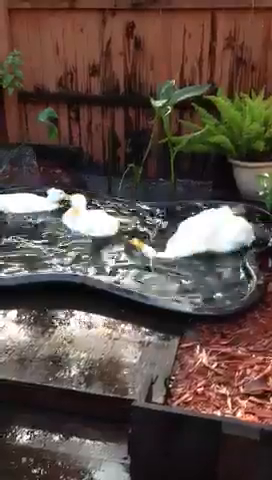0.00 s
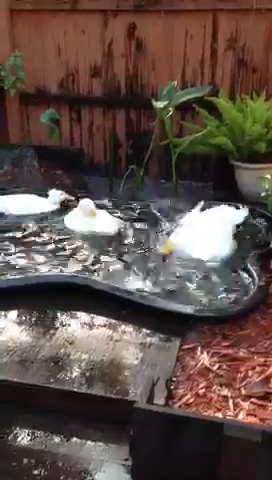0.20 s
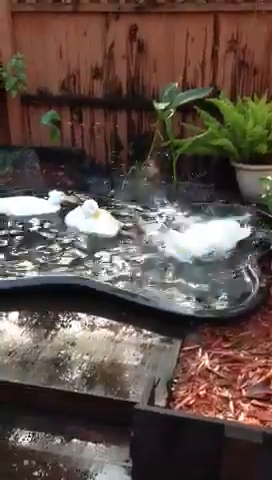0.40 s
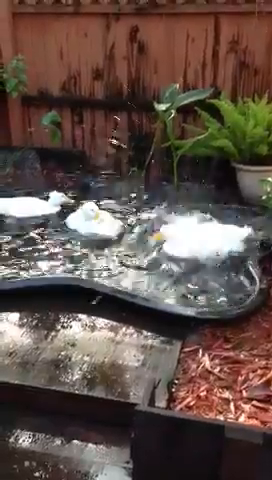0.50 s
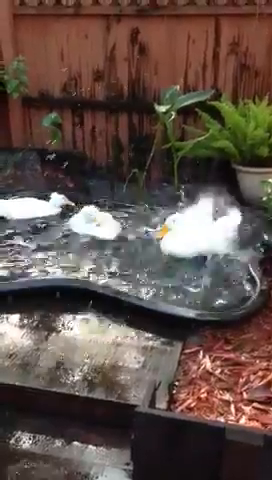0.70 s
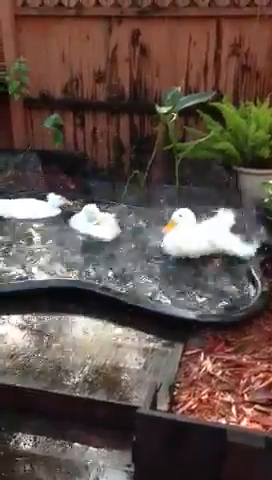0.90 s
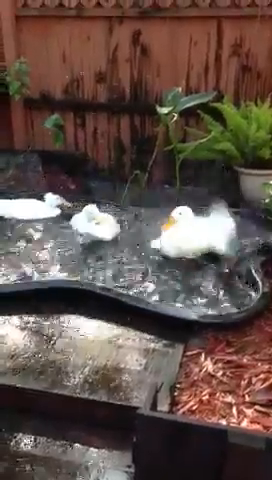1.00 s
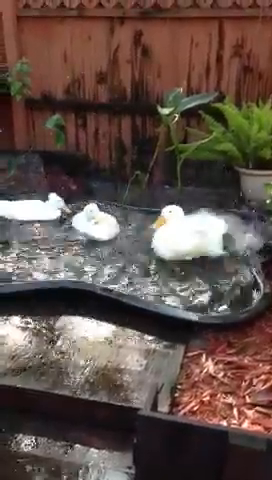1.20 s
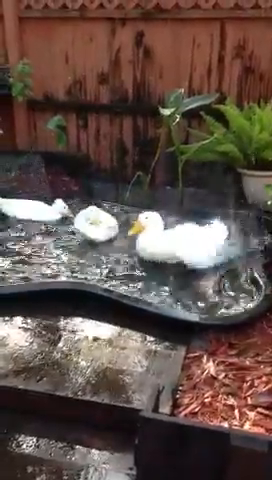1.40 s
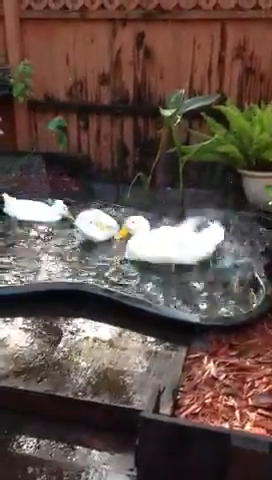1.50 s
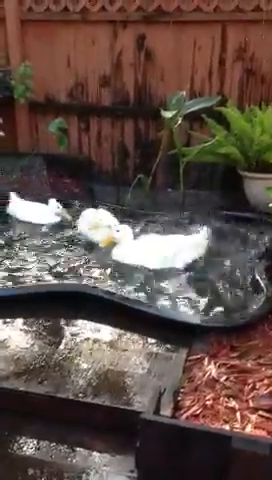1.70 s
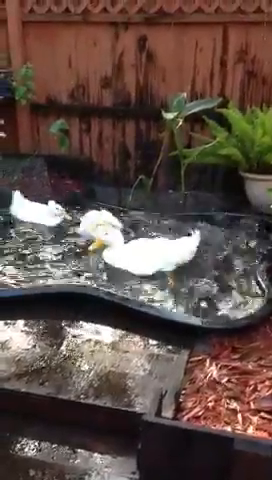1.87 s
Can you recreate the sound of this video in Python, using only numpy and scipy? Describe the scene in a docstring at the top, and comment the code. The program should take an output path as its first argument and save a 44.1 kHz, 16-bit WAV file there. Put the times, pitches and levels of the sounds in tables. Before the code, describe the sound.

Splashing water from a bathing duck, first a body splash with gurgling gushes, then rapid wet slaps of beating wings, and finally sparse drips, heard outdoors from a few metres with a short fence echo.

```python
"""A garden pond, a few metres from the microphone: a duck bathes. It ducks under and throws water over its
back in gushes, with a first splash of the body, then beats its wings: five wing slaps on the water.
Slaps are pulses, cracks, thumps and spray; water is tiny impacts and bubbles, which thin out at the end.
Throughout, a low hum, probably the pond pump, runs under quiet air; a wooden fence echoes the duck briefly."""
import sys
import numpy as np
from scipy import signal
from scipy.fft import rfft, irfft
from scipy.io import wavfile

SR = 44100
rng = np.random.default_rng(int(sys.argv[2]) if len(sys.argv) > 2 else 0)


def file_out(sig):
    """Save sig as 16-bit WAV at sys.argv[1]."""
    # one column per channel
    cols = np.atleast_2d(sig).T
    # limit, then scale
    lim = np.clip(cols, -1, 1)
    pcm = np.round(lim * 32767).astype(np.int16)
    wavfile.write(sys.argv[1], SR, pcm)


N = 85995  # length [samples]


def undb(db):
    """Decibels to gain."""
    return 10 ** (np.asarray(db) / 20)


def clock():
    """Time of each sample in seconds."""
    return np.arange(N) / SR


def unit(x):
    """Scale to rms 1."""
    return x / np.sqrt(np.mean(x ** 2) + 1e-20)


def freqs():
    """Frequency of each spectral bin in Hz, at least 1."""
    return np.maximum(np.arange(N // 2 + 1) * SR / N, 1)


def colour(x, points, tilt_db=0):
    """Weight the spectrum of x by (frequency [Hz], level [dB]) points and a tilt per octave; rms 1."""
    hz, db = np.array(points).T
    octave = np.log2(freqs())
    weight_db = np.interp(octave, np.log2(hz), db) + tilt_db * octave
    return unit(irfft(rfft(x) * undb(weight_db), N))


def band(x, hz, octaves):
    """A bell-shaped band of x; rms 1."""
    bell = np.exp(-.5 * (np.log2(freqs() / hz) / octaves) ** 2)
    return unit(irfft(rfft(x) * bell, N))


def noise():
    """White noise."""
    return rng.standard_normal(N)


def walk(rate_hz):
    """Slow random wandering, rms 1."""
    return unit(irfft(rfft(noise()) * np.exp(-(freqs() / rate_hz) ** 2), N))


def clicks(per_s, scatter_db):
    """Tiny impacts at random moments, a few much larger than the rest."""
    struck = rng.random(N) < per_s / SR
    size = np.minimum(rng.exponential(size=N), 5)
    return struck * np.sign(noise()) * undb(scatter_db * size)


def swell(at, rise, fall):
    """An envelope that grows exponentially to 1 at its top and dies away."""
    t = clock() - at
    return np.exp(np.minimum(t / rise, -t / fall))


def add(out, at, hz, gain, cycles, glide):
    """Add one bubble: it radiates the change of a pulsation that rises in pitch and fades by 60 dB."""
    start = max(int(at * SR), 0)
    length = max(min(int(cycles / hz * SR), N - start), 0)
    t = np.arange(length) / SR
    age = t * hz / cycles  # 0 to 1 over its life
    ring = np.sin(2 * np.pi * hz * t * (1 + glide * age / 2))
    onset = 1 - np.exp(-2 * np.pi * hz * t)
    pulsation = ring * np.exp(-np.log(1000) * age) * onset
    out[start:start + length] += gain * np.diff(pulsation, prepend=0) * SR / (2 * np.pi * hz)


BUBBLE_SCATTER_DB, BUBBLE_GLIDE = 3.5, .3  # spread of loudness; rise of pitch as a share


def bubble_cloud(low_hz, high_hz, cycles, count):
    """Many small bubbles of random size, living half to one and a half times the cycles; rms 1."""
    out = np.zeros(N)
    for k, (when, size, loud, life) in enumerate(rng.random((count, 4))):
        at = (k + 2 * when) / count * N / SR
        hz = low_hz * (high_hz / low_hz) ** size
        gain = undb(-BUBBLE_SCATTER_DB * np.log(loud + 0.037))
        add(out, at, hz, gain, cycles * (.5 + life), BUBBLE_GLIDE)
    return unit(out)


# Weighting of the wet crack: (frequency [Hz], level [dB per Hz])
CRACK_SPECTRUM = [(80, -24), (200, -7.5), (450, -9.5), (900, -9), (2000, 1), (3500, -2), (5000, -3.5),
                  (7500, -1), (10000, -10), (15000, -14.5)]
# Weighting of the spray, also of the tick of a drop: (frequency [Hz], level [dB per Hz])
SPRAY_SPECTRUM = [(300, -30), (1000, -26), (2500, -27), (4500, 5.5), (7000, 3.5), (10000, -1.5),
                  (15000, -8)]
IMPACT_CYCLES, CRACK_RISE_S = 4.3, 0.00041
THUMP_RISE_S, THUMP_FALL_S = 0.0042, 0.0047
SPRAY_RISE_S, SPRAY_FALL_S, SPRAY_PER_S = 0.0089, 0.015, 4200
# Density and size spread of the impacts in gushes and splatter; the spray shares the spread
GUSH_PER_S, GUSH_SCATTER_DB = 4600, 3
# A first splash of the body, then five wing slaps on the water: (time [s],
# impact level [dB, before doubling the amplitude], impact pitch [Hz], crack level [dB], crack decay [s],
# crack brightness [dB per octave], thump level [dB], thump pitch [Hz], spray level [dB])
SLAPS = [(0.3315, -22.5, 2010, -26, 0.0058, -1.5, -42.5, 302.2, -37),
         (.9620, -15.5, 2970, -29, 0.0055, -1.2, -34.5, 190, -32),
         (1.0812, -12.5, 1830, -16.5, 0.0025, -1.55, -33, 198, -38),
         (1.2112, -23.5, 960, -30, 0.0089, -1.8, -41.5, 240, -43),
         (1.3347, -15, 2000, -23, 0.0025, -1.2, -46, 194.4, -43.5),
         (1.4834, -18, 1670, -24.5, 0.0036, 4.6, -41.5, 232.5, -42)]


def slaps():
    """A sharp pressure pulse, a wet crack, the thump of the hollow in the water, and spray."""
    out = np.zeros(N)
    for at, impact_db, hz, crack_db, decay, tilt_db, thump_db, thump_hz, spray_db in SLAPS:
        add(out, at, hz, 2 * undb(impact_db), IMPACT_CYCLES, 0)
        crack = colour(noise(), CRACK_SPECTRUM, tilt_db)
        out += undb(crack_db) * swell(at, CRACK_RISE_S, decay) * crack
        thump = unit(np.sin(2 * np.pi * (thump_hz * clock() + rng.random())))
        out += undb(thump_db) * swell(at, THUMP_RISE_S, THUMP_FALL_S) * thump
        spray = colour(clicks(SPRAY_PER_S, GUSH_SCATTER_DB), SPRAY_SPECTRUM)
        out += undb(spray_db) * swell(at, SPRAY_RISE_S, SPRAY_FALL_S) * spray
    return out


GUSH_IMPACT_DB = -0.5
FROTH_DB, FROTH_LOW_HZ, FROTH_HIGH_HZ, FROTH_CYCLES = -7.5, 798, 4980, 20
# Gushes of water pushed by body and wings: (time of the top [s], level [dB], rise [s], fall [s],
# centre [Hz], width [octaves])
WATER_GUSHES = [(.03, -58, .02, .02, 6000, 0.19), (.072, -53, 0.018, 0.011, 2070, 0.64),
                (0.231, -43.5, 0.0096, .04, 3070, 0.51), (0.315, -47, 0.0046, 0.0086, 450, 0.51),
                (0.32, -43, 0.0028, .008, 2130, 0.95), (.328, -27, 0.01, 0.0037, 1770, 0.57),
                (.482, -45, 0.034, 0.0082, 1430, .8), (0.551, -37, 0.022, 0.017, 1830, 0.96),
                (0.677, -39.5, 0.0019, .006, 930, 1), (0.668, -35.5, 0.013, 0.031, 2600, 1.1),
                (0.768, -37, 0.0087, 0.0042, 2050, 0.4), (0.807, -36, 0.049, 0.019, 2660, 1.07),
                (0.9613, -31, 0.0074, 0.0033, 1080, 0.79), (0.985, -42, 0.024, 0.012, 2500, 0.45),
                (1.14, -55, .02, .015, 1690, 0.27), (1.193, -39.5, 0.0043, 0.0086, 2670, 0.2),
                (1.318, -38, 0.0037, .007, 800, 0.55), (1.3305, -32, 0.002, .002, 1400, 1.6),
                (1.386, -44, 0.013, 0.023, 1550, 0.94), (1.4785, -31.5, 0.0004, 0.0085, 1760, 0.64),
                (1.52, -49.5, 0.0089, 0.039, 1390, .8), (1.816, -49, 0.0044, .005, 3400, .8),
                (1.670, -42, .004, 0.0055, 3680, 0.97), (1.694, -42, 0.0035, 0.0051, 3180, 0.36)]


def gushes():
    """Sheets of water break up into dense bursts of tiny impacts and trapped bubbles."""
    froth = bubble_cloud(FROTH_LOW_HZ, FROTH_HIGH_HZ, FROTH_CYCLES, count=1100)
    out = np.zeros(N)
    for at, db, rise, fall, hz, octaves in WATER_GUSHES:
        impacts = undb(GUSH_IMPACT_DB) * band(clicks(GUSH_PER_S, GUSH_SCATTER_DB), hz, octaves)
        bubbles = undb(FROTH_DB) * band(froth, hz, octaves)
        out += undb(db) * swell(at, rise, fall) * (impacts + bubbles)
    return out


# Levels of patter, fizz and gurgle are relative to the stirring
PATTER_DB, PATTER_PER_S, PATTER_SCATTER_DB = -1.5, 3200, 1
PATTER_FLICKER_DB, PATTER_FLICKER_HZ = 1.5, 60
FIZZ_DB, FIZZ_LOW_HZ, FIZZ_HIGH_HZ, FIZZ_CYCLES = -6.5, 2376, 9340, 25
GURGLE_DB, GURGLE_LOW_HZ, GURGLE_HIGH_HZ, GURGLE_CYCLES = -7.5, 701, 2810, 15.6
SLOSH_DB, SLOSH_HZ, SLOSH_OCTAVES = -59.5, 268, 0.43
SLOSH_FOLLOW = 0.48  # share of the stirring's dB swings
# Weighting of the patter: (frequency [Hz], level [dB per Hz])
PATTER_SPECTRUM = [(300, -24), (700, -5.5), (1500, 4.5), (3000, 1), (5000, 1), (7000, 0), (10000, -5.5),
                   (15000, -13.5)]
# How hard the water is stirred: (time [s], level [dB])
STIRRING = [(0, -63), (0.188, -56), (0.224, -43), (.30, -49.5), (.36, -44.5), (.43, -50), (.47, -43.5),
            (.53, -45.5), (.63, -45), (.71, -45), (.82, -42.5), (.865, -49), (.91, -44.5), (1.0, -46),
            (1.045, -46.5), (1.12, -46.5), (1.3, -45), (1.5, -49.5), (1.62, -51), (1.76, -52.5),
            (1.86, -60), (1.95, -57.5)]


def stirred_water():
    """Uneven patter, fizz, gurgle and a low slosh all follow how hard the water is stirred."""
    stir = undb(np.interp(clock(), *np.array(STIRRING).T))
    drops = colour(clicks(PATTER_PER_S, PATTER_SCATTER_DB), PATTER_SPECTRUM)
    patter = undb(PATTER_DB + PATTER_FLICKER_DB * walk(PATTER_FLICKER_HZ)) * drops
    fizz = undb(FIZZ_DB) * bubble_cloud(FIZZ_LOW_HZ, FIZZ_HIGH_HZ, FIZZ_CYCLES, count=700)
    gurgle = undb(GURGLE_DB) * bubble_cloud(GURGLE_LOW_HZ, GURGLE_HIGH_HZ, GURGLE_CYCLES, count=320)
    slosh = undb(SLOSH_DB) * band(noise(), SLOSH_HZ, SLOSH_OCTAVES)
    return stir * (patter + fizz + gurgle) + unit(stir ** SLOSH_FOLLOW) * slosh


# Single bubbles and air pockets: (time [s], pitch [Hz], peak level [dB], life [cycles],
# rise of pitch [share])
SINGLE_BUBBLES = [(.0865, 2570, -34.5, 55, 0.065), (.106, 785, -41, 110, 0.27),
                  (0.127, 861, -45.5, 83, 1.53), (.139, 1022, -42, 91, .8), (.2698, 3080, -31, 65, 0),
                  (.273, 250, -36.5, 10, 0.36), (.306, 910, -37, 18, 1.2), (.3167, 2700, -24, 22, 1.2),
                  (.442, 623, -43, 58, 0.59), (.480, 2000, -33, 50, 0.33), (.489, 996, -33.5, 32, 0),
                  (.503, 1290, -44, 45, 0.23), (.541, 1033, -35.5, 36, 0.68), (.673, 900, -20.5, 7, 0.18),
                  (.764, 1510, -29, 29, 0), (.881, 1760, -39, 49, 0.054), (.889, 1020, -40.5, 26, 1.34),
                  (.9455, 270, -29.5, 9.3, 0.96), (1.066, 616, -32.5, 15, 0.29), (1.0825, 1480, -18, 13, 0),
                  (1.188, 1174, -37.5, 72, .1), (1.208, 560, -33.5, 17, 0.024),
                  (1.317, 300, -33, 7.3, 0.25), (1.358, 1980, -36.5, 55, 0.003), (1.384, 1180, -53, 42, 1),
                  (1.452, 840, -33.5, 11, 0), (1.480, 554, -26.5, 13, 0.25), (1.482, 900, -30.5, 47, .03),
                  (1.559, 785, -42.5, 19, 0), (1.586, 1150, -44, 41, 1.9)]


def single_bubbles():
    """Larger bubbles and air pockets ring, many of them rising in pitch."""
    out = np.zeros(N)
    for at, hz, db, cycles, glide in SINGLE_BUBBLES:
        add(out, at, hz, undb(db), cycles, glide)
    return out


DROP_CYCLES, DROP_GLIDE = 26.3, 0.046  # life of the ping; rise of its pitch as a share
# Tick and splatter levels are relative to the ping
DROP_TICK_DB, DROP_TICK_S = -15, 0.002
SPLATTER_DB, SPLATTER_S, SPLATTER_OCTAVES = -13.5, 0.0034, 0.36
# Separate drops landing: (time [s], pitch [Hz], peak level of the ping [dB])
SINGLE_DROPS = [(0.0774, 9100, -34), (0.119, 7000, -39.5), (.239, 6470, -32), (0.2607, 4770, -30),
                (.466, 6040, -24.5), (.519, 5300, -29), (.527, 4100, -28.5), (0.576, 6200, -29),
                (.829, 8650, -22), (0.869, 4930, -27), (1.052, 7060, -30), (1.506, 6600, -30),
                (1.584, 4330, -40.5), (1.618, 4900, -35), (1.676, 4240, -34.5), (1.700, 10300, -31),
                (1.733, 2750, -37), (1.753, 4270, -37), (1.759, 3140, -35), (1.798, 3940, -40),
                (1.817, 3350, -40.5), (1.888, 4570, -36.5)]


def single_drops():
    """Each drop ticks on the surface, pings as a bubble and splatters around its pitch."""
    out = np.zeros(N)
    splatter = clicks(GUSH_PER_S, GUSH_SCATTER_DB)
    tick = undb(DROP_TICK_DB) * colour(noise(), SPRAY_SPECTRUM)
    for at, hz, db in SINGLE_DROPS:
        add(out, at, hz, undb(db), DROP_CYCLES, DROP_GLIDE)
        out += undb(db) * swell(at, CRACK_RISE_S, DROP_TICK_S) * tick
        burst = band(splatter, hz, SPLATTER_OCTAVES)
        out += undb(db + SPLATTER_DB) * swell(at, CRACK_RISE_S, SPLATTER_S) * burst
    return out


FENCE_S, FENCE_DB = .012, -22  # echo delay and level
YARD_DB, YARD_T60_S, YARD_HZ = -18, 0.15, 4520  # tail level, 60 dB decay, treble corner


def yard(x):
    """One echo from the fence and a short, duller tail of decaying noise."""
    t = clock()
    dull = irfft(rfft(noise()) / np.hypot(1, freqs() / YARD_HZ), N)
    decay = np.exp(-np.log(1000) * t / YARD_T60_S)
    tail = dull * decay * np.minimum(t / FENCE_S, 1)  # builds up until the echo
    wet = signal.fftconvolve(x, tail / np.linalg.norm(tail))[:N]
    echo = np.interp(t - FENCE_S, t, x, left=0)
    return x + undb(FENCE_DB) * echo + undb(YARD_DB) * wet


HUM_HZ, HUM_DRIFT = 158.4, 0.0097  # mean pitch; its rms drift as a share
HUM_DB, HUM_WAVER_DB = -56.5, -1.5


def hum():
    """A low tone, probably the pond pump, wavers in pitch and level."""
    pitch_hz = HUM_HZ * (1 + HUM_DRIFT * walk(9.8))
    phase = 2 * np.pi * np.cumsum(pitch_hz) / SR
    return undb(HUM_DB + HUM_WAVER_DB * walk(5.8)) * unit(np.sin(phase))


AIR_DB = -56
# Weighting of the outdoor air: (frequency [Hz], level [dB per Hz])
AIR_SPECTRUM = [(25, -9), (60, 2), (100, -5.5), (125, 6), (200, 7), (300, -6), (420, -1.5), (800, -0.5),
                (1500, -19.5), (3000, -44), (6000, -23), (10000, -19), (15000, -24.5)]


def outdoor_air():
    """Quiet outdoor air: steady coloured noise."""
    return undb(AIR_DB) * colour(noise(), AIR_SPECTRUM)


def scene():
    """The duck's water sounds echo in the yard; hum and air lie beneath."""
    duck = slaps() + gushes() + stirred_water() + single_bubbles() + single_drops()
    return (yard(duck) + hum() + outdoor_air())[None]


TOP_HZ = 15400


def record(dry):
    """The microphone thins the deep bass and cuts the top."""
    bass_cut = signal.butter(3, 110, "high", fs=SR, output="sos")
    top_cut = signal.ellip(8, .2, 80, TOP_HZ, fs=SR, output="sos")
    return signal.sosfilt(top_cut, signal.sosfilt(bass_cut, dry))


dry = scene()
out = record(dry)
file_out(out)
```